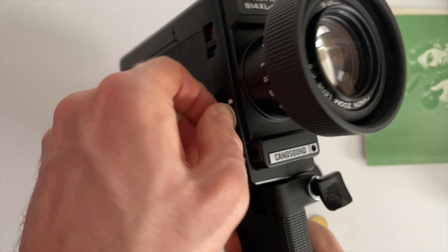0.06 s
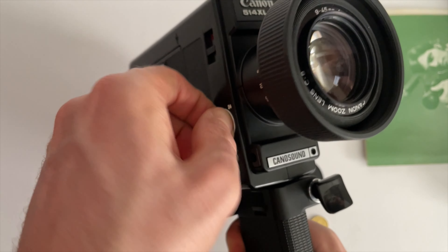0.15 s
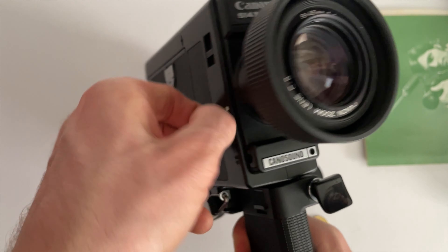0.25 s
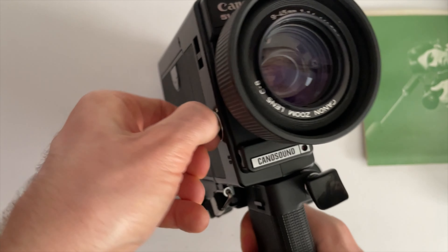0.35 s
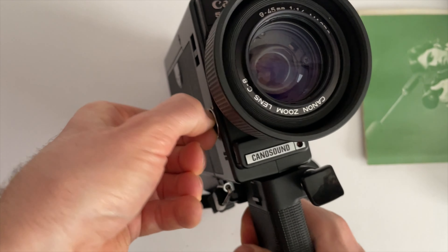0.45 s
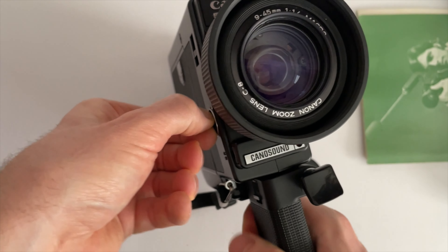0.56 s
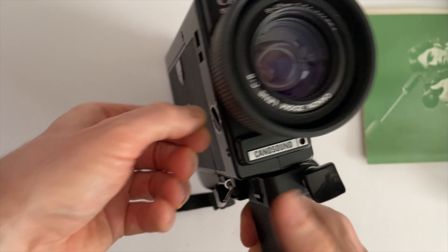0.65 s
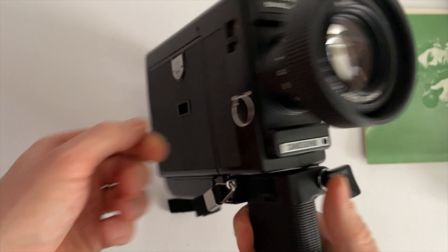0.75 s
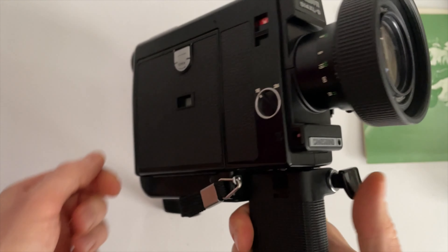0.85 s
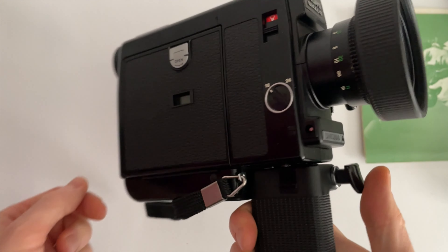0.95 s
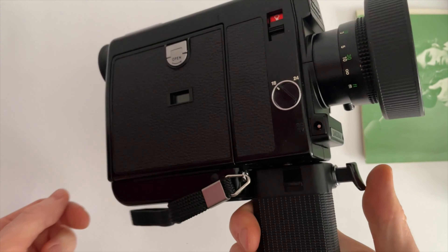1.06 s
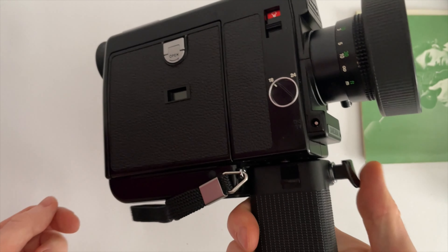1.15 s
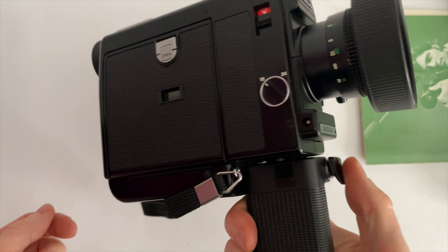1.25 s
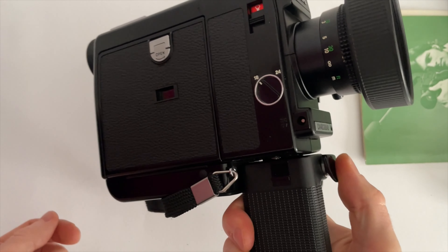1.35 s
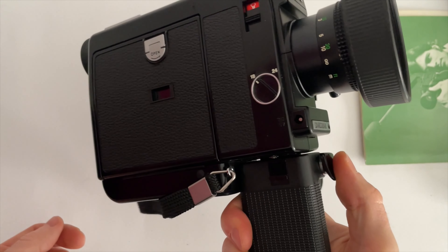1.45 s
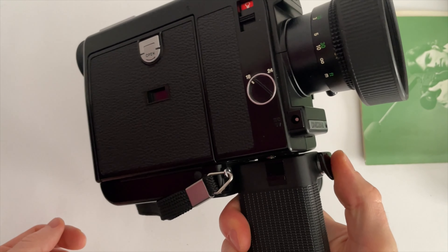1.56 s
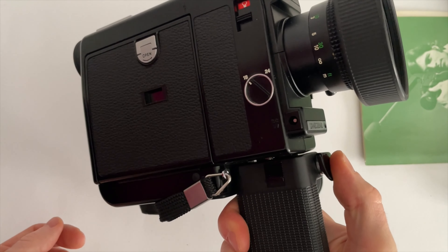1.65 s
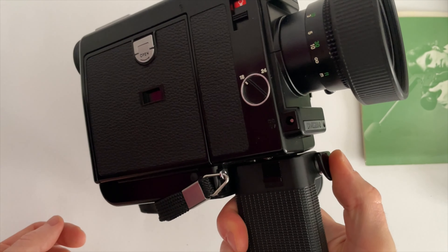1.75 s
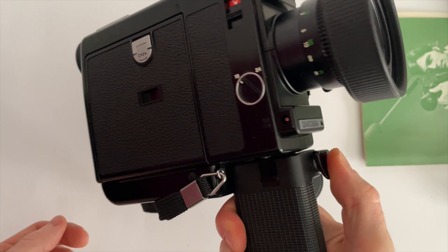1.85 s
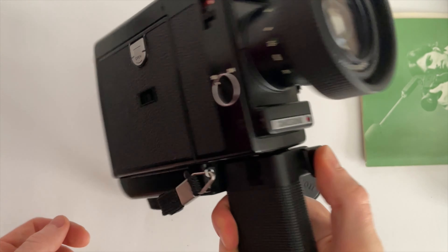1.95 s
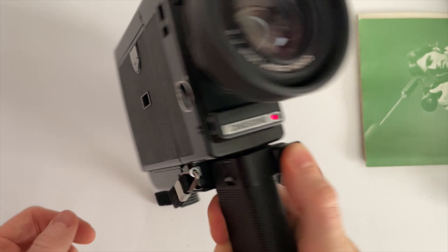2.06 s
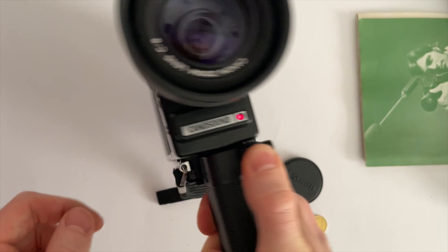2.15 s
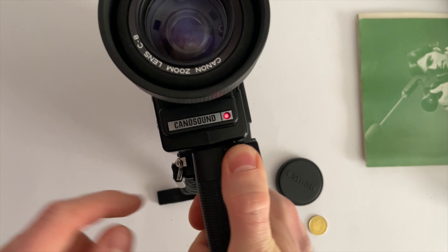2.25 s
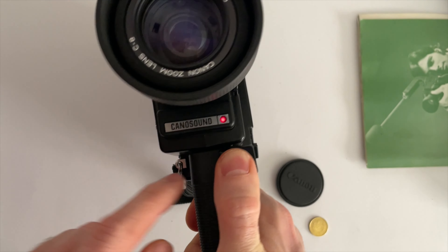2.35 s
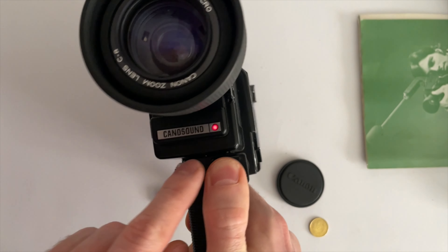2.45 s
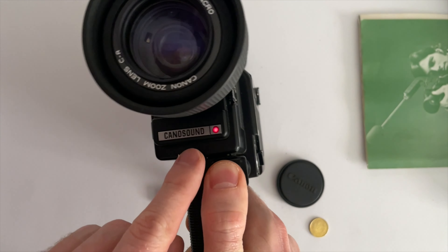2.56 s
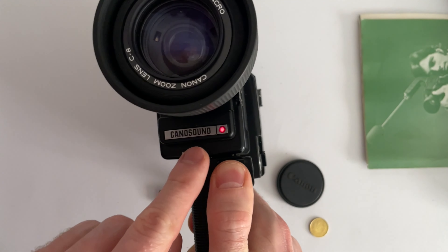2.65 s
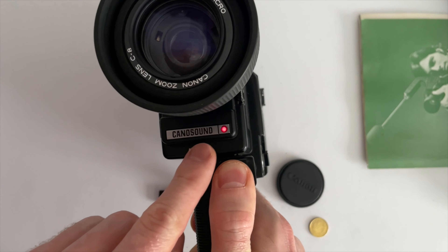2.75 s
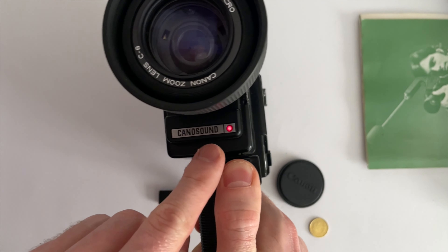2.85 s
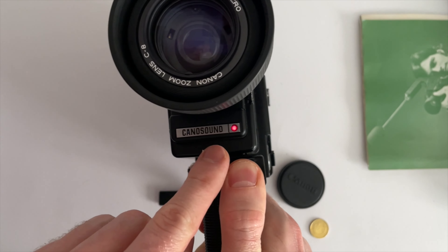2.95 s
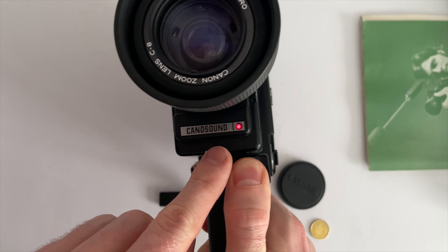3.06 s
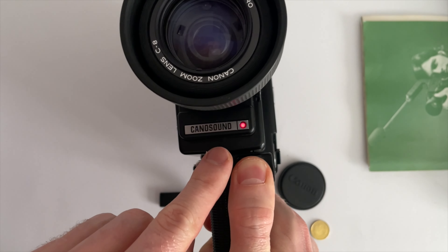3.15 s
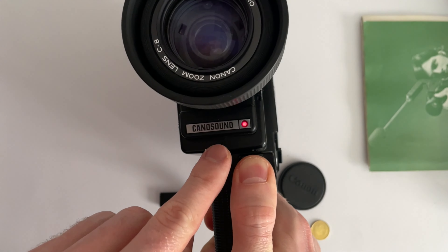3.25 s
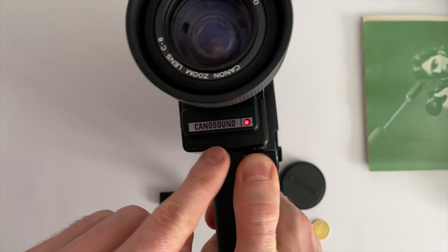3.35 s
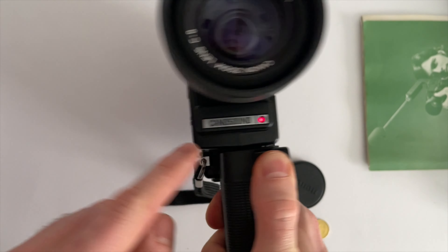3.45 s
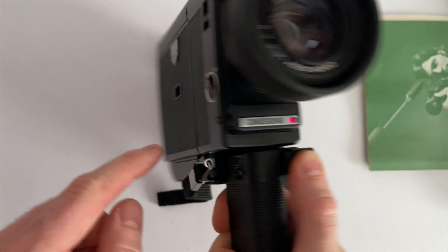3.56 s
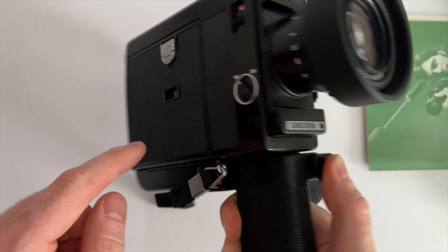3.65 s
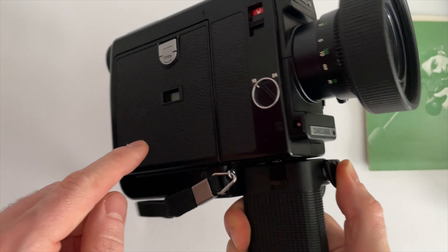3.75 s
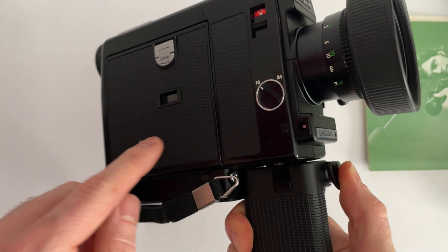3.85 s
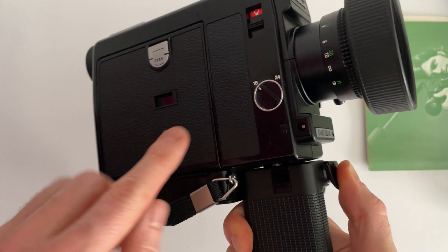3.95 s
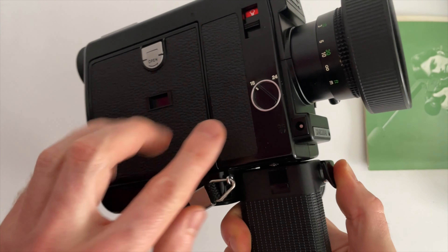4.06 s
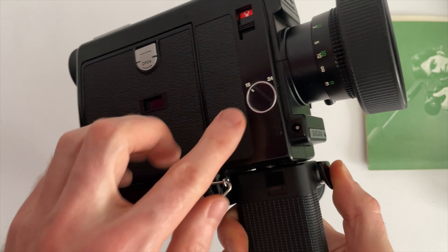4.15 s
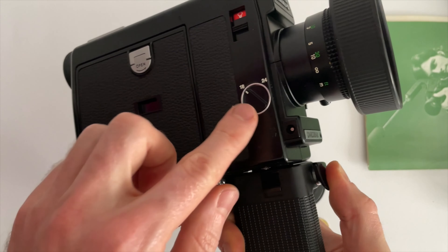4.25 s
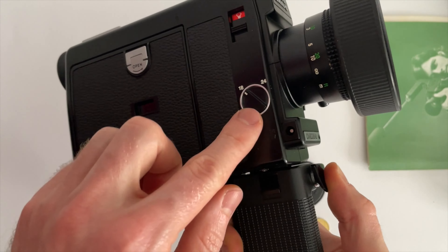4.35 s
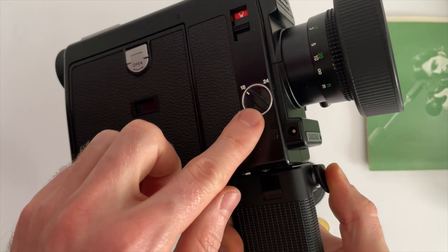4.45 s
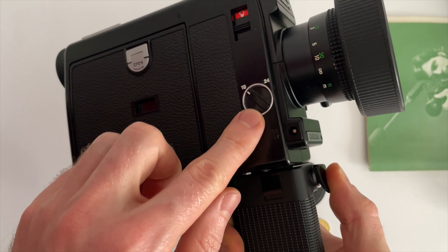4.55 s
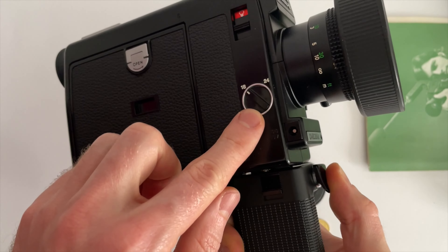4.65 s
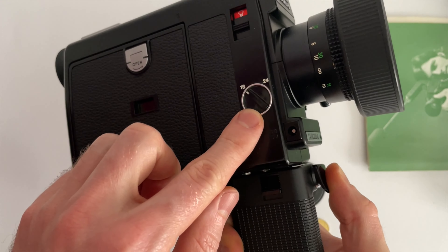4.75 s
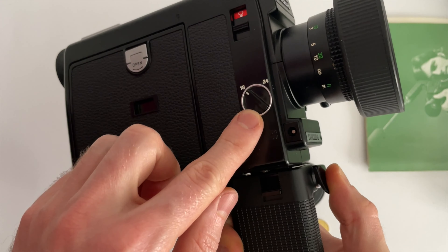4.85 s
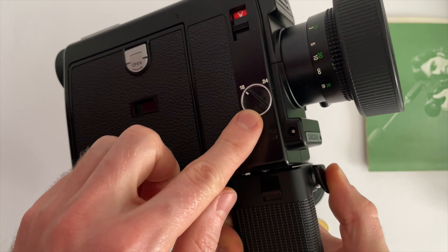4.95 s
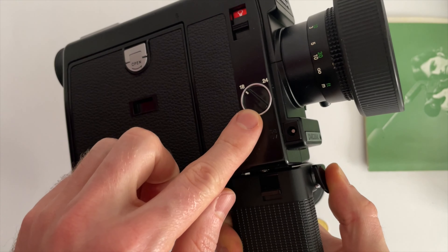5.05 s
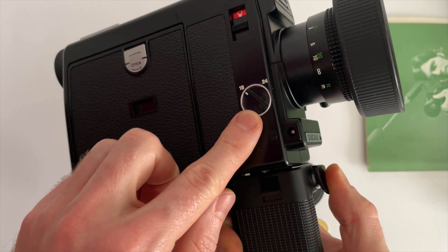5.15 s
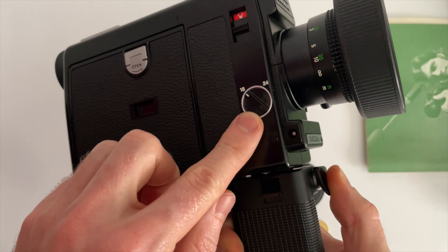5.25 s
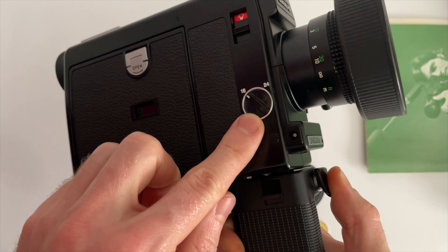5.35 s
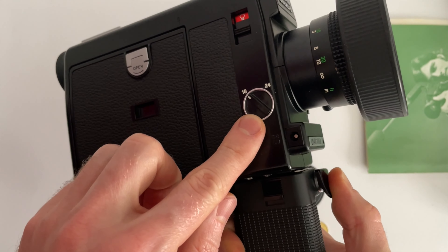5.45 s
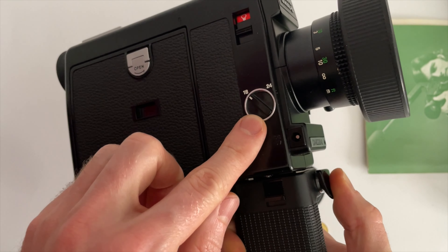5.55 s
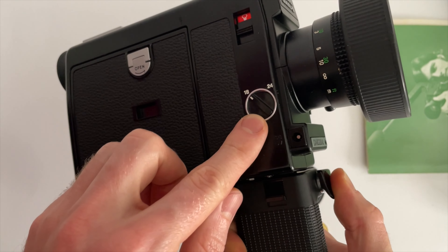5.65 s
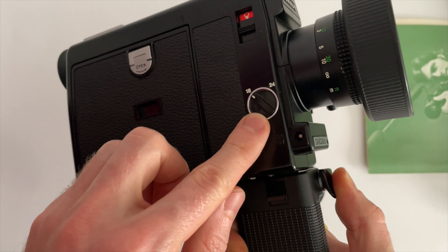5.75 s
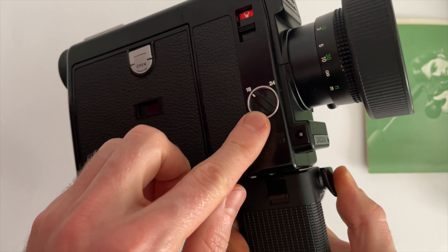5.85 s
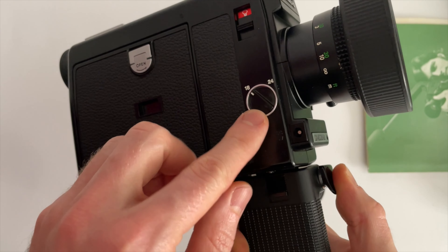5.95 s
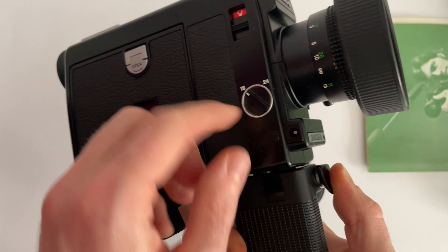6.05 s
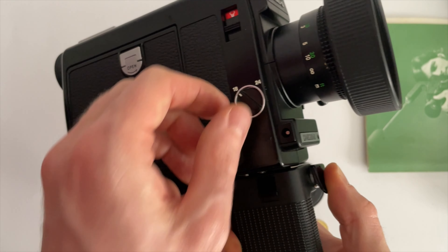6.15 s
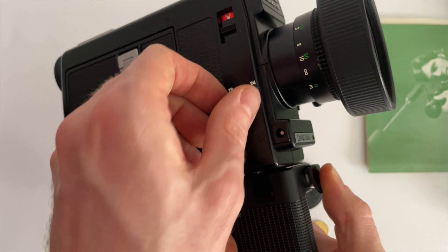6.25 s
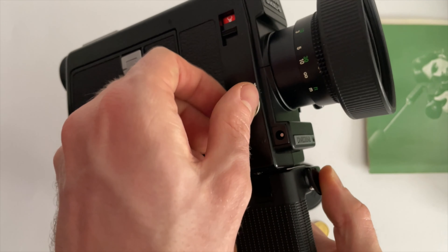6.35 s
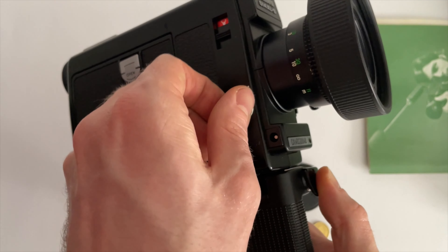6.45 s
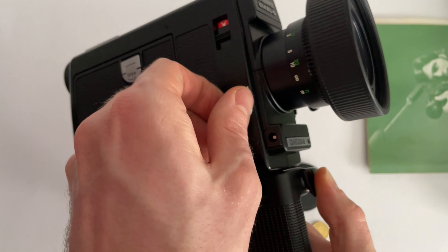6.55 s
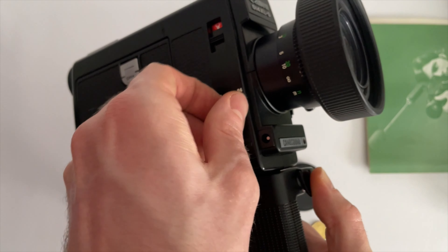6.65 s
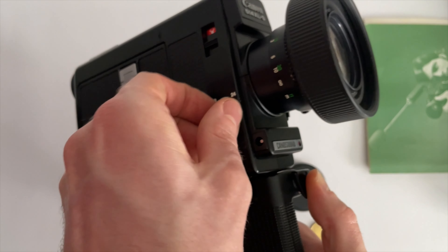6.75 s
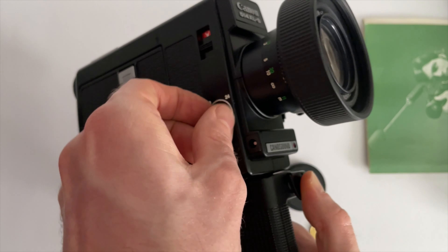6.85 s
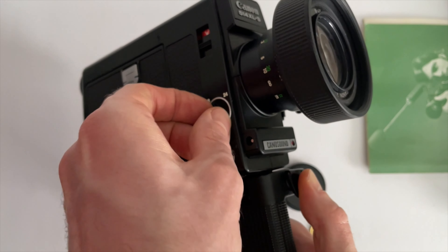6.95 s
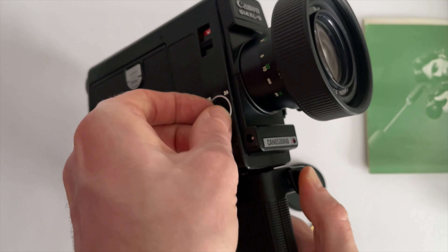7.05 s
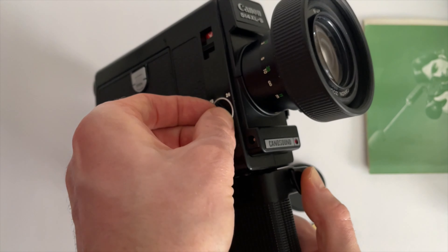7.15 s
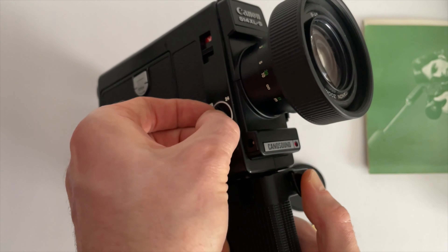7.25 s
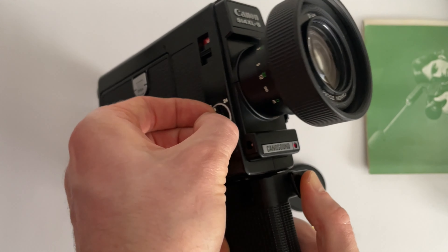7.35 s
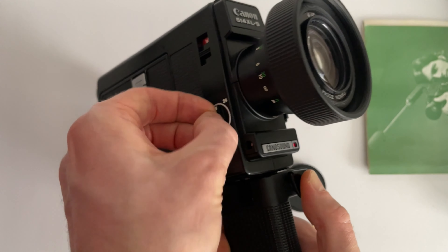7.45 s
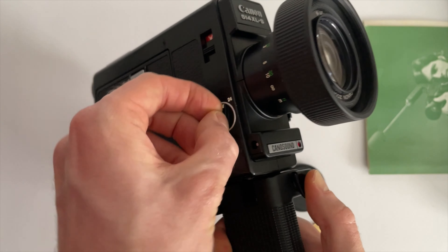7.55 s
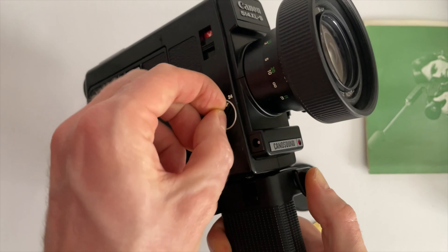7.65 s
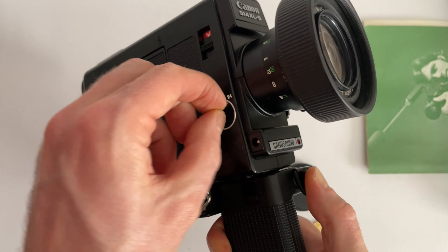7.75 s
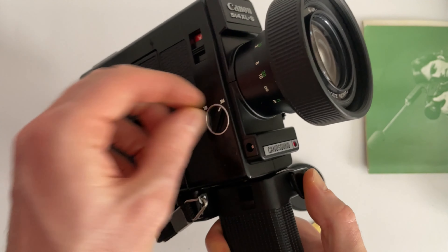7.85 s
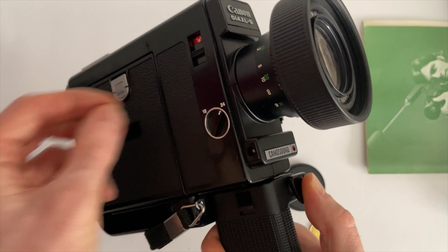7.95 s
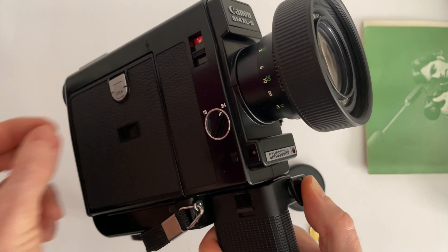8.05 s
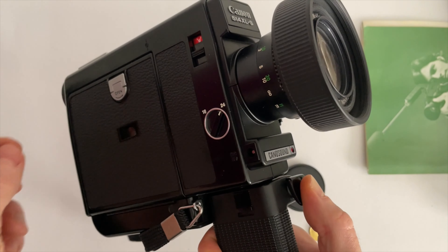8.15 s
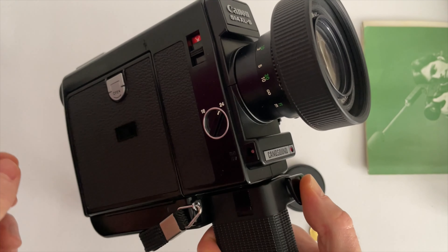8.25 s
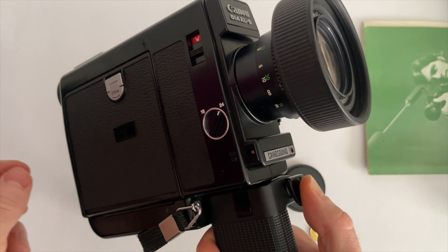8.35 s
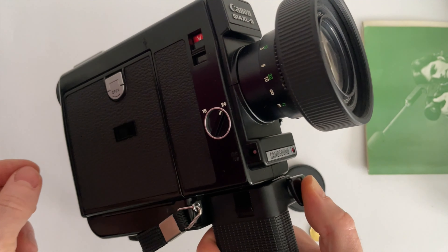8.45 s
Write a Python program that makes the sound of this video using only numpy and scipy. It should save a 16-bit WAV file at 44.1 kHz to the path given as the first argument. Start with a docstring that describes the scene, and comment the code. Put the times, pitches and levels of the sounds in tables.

```python
"""Fingers fumble at a small film camera held over a desk, close to a phone; a switch and the trigger snap,
then the motor runs. The claw clatters twice a frame over gear whirr and the hum of the shaft. The camera is
turned in the hand, and a dial clicks it over to the faster frame rate.
Knocks and rubs are short or shaped noise with ringing sines, the hum is a stack of sines, and filters
colour the camera's sound and set the left and right channels apart."""
import sys
import numpy as np
from scipy import signal
from scipy.fft import rfft, irfft, next_fast_len
from scipy.io import wavfile
from scipy.ndimage import uniform_filter1d, map_coordinates

SR = 44100
rng = np.random.default_rng(int(sys.argv[2]) if len(sys.argv) > 2 else 0)


def to_wav(s):
    """Save 16-bit WAV."""
    ch = np.atleast_2d(s).T  # columns
    pcm = np.round(np.clip(ch, -1, 1) * 32767)  # PCM
    wavfile.write(sys.argv[1], SR, pcm.astype(np.int16))


N = 374850
T = np.arange(N) / SR

# How fast the motor drives the claw. Each row: time in seconds, claw strokes per second.
STROKE_SPEED = [(1.449, 44.4), (1.5, 37.9375), (3.85, 37.9375), (3.95, 37.664), (6.65, 37.664),
                (6.75, 37.99), (7.5, 37.99), (7.62, 52.1), (7.78, 49.85), (8.5, 49.87)]
# How hard whirr, claw and wheel sound. Each row: time in seconds, level in dB before the case colours it.
DRIVE_LEVEL = [(1.5, -50), (1.65, -47.5), (3.83, -48), (4.3, -48.5), (5.58, -49), (7.5, -48), (7.6, -46.5),
               (8.5, -45.5)]
# Turns on which the wheel drags harder. Each row: time in seconds, added rub in dB against the whirr.
HARD_RUBS = [(3.53, 0.5), (3.95, 4.5), (4.59, -1), (4.8, 1), (5.01, 3.5), (5.23, 0.5), (5.44, -10),
             (7.34, -3), (7.55, 0), (8.19, -15), (8.35, -6)]
# The hardest claw blows. Each row: time in seconds, level in dB before the case colours it.
HARD_BLOWS = [(1.45, -36.5), (1.497, -35.5), (1.5493, -36), (1.6821, -35.5), (1.815, -39), (2.0809, -40),
              (2.1303, -35), (2.3962, -44), (3.237, -36), (3.2913, -35), (3.3179, -35.5), (3.6074, -44),
              (3.6594, -39), (3.7137, -42), (3.742, -34), (3.7663, -37), (4.002, -32.5), (4.136, -37),
              (4.2959, -43), (4.4812, -36), (4.72, -37.5), (4.774, -34.5), (5.012, -37), (5.1721, -36),
              (5.1985, -36.5), (5.33, -36.5), (5.5164, -36), (5.7551, -43), (6.0225, -49), (6.4223, -39),
              (6.6046, -43), (7.056, -35), (7.319, -35), (7.475, -35.5), (7.755, -38), (8.2067, -42),
              (8.2968, -46), (8.349, -47), (8.4135, -41)]
# The case seen from its side. Each row: frequency in Hz, gain in dB (9 dB is added to all).
CASE_COLOUR = [(250, -23), (520, -1), (650, 3), (880, -7), (1400, -1), (2200, -5.5), (3000, -1.5),
               (3800, -7), (4800, -6.5), (5500, -12), (6750, -4.5), (7300, -9), (10000, -14), (12000, -22),
               (15600, -25)]


def motor():
    """Gear whirr, claw and wheel sound through the case; impacts are brighter than the whirr."""
    started = T > STROKE_SPEED[0][0]
    count = np.cumsum(curves(STROKE_SPEED)[0] * started) / SR  # strokes made so far
    running = np.clip(3 * count, 0, 1)
    level = running * amp(curves(DRIVE_LEVEL)[0])

    waver = amp(0.98 * wobble(60) + 0.97 * wobble(8))
    tooth_db = -3  # pinion ticks against the smooth noise of the gears
    whirr = level * waver * unit(rng.standard_normal(N) + amp(tooth_db) * teeth(count))
    # the treble rises 0.5 dB per octave above 2 kHz
    whirr = filtered(whirr, lambda hz: amp(0.5 * np.log2(np.clip(hz / 2000, 1, None))))

    clatter = amp(by_rate(-0.35, -2.35)) * claw(count)  # at the fast rate the whirr grows over the claw
    rub = amp(by_rate(-5.5, -2.5))
    rub = rub + sum(amp(db) * (abs(T - s - .02) < .06) for s, db in HARD_RUBS)
    s, blow_db = np.transpose(HARD_BLOWS)
    impacts = level * (clatter + rub * wheel(count)) + bursts(s, blow_db, 0.039)
    impacts = filtered(impacts, lambda hz: amp(4.4 * np.log2((hz + 1) / 3500)))  # dB per octave

    hum = running * amp(curves(POSE)[2]) * shaft(count)
    enclosed = filtered(whirr + impacts, lambda hz: amp(along(CASE_COLOUR, hz) + 9))
    return held(enclosed + hum)


def claw(count):
    """Each stroke is a cluster of small impacts; the pull-down stroke is the harder of the two."""
    k = np.arange(int(count[-1]))
    draw = rng.standard_normal((len(k), 9))
    lag = np.array([0, .09, .19, .55]) + 0.028 * draw[:, :4]  # parts of a stroke
    times = np.interp(k[:, None] + lag, count, T)
    scatter_db = 1.8 * draw[:, 4:8] + 1.2 * draw[:, 8:]  # each impact, then the whole stroke
    softer_db = 0.86 * (k % 2)[:, None]
    db = np.array([2.5, -8.5, 0.5, -7.0]) + scatter_db - softer_db
    return unit(bursts(times.ravel(), db.ravel(), 0.017))


def teeth(count):
    """Every tooth of the motor pinion ticks, each with its own strength."""
    passed = count * 7 / 6 * 10  # ten teeth on each shaft turn
    k = np.arange(int(passed[-1]))
    draw = rng.standard_normal((len(k), 2))
    times = np.interp(k + .08 * draw[:, 0], passed, T)
    return unit(bursts(times, 3.5 * draw[:, 1], 0.009))


def wheel(count):
    """A slow wheel rubs briefly once in eight strokes; at the fast rate it also squeals."""
    squeal_hz, width_hz, squeal_db = 4410, 220, 8
    turn = (count + 1) % 8  # strokes since the rub began
    touch = np.clip(8 * turn, 0, 1) * np.clip(3 * (1.6 - turn), 0, 1)
    rub = rng.standard_normal(N)
    squeal = filtered(rub, lambda hz: amp(squeal_db) / (1 + (2 * (hz - squeal_hz) / width_hz) ** 2))
    return touch * (rub + fast(T) * squeal)


# The tones of the hum. Each row: multiple of the shaft speed (rounded when played),
# strength in dB at the slow rate, strength in dB at the fast rate.
SHAFT_TONES = [(5, -38, -10.5), (10, -4, -10), (11, -8, -3), (12, -17, -13), (13, -21, -28),
               (14.1, -2, -18), (14.8, -1.5, -18), (16, -22, -20), (17, -15.5, -16), (18, -25, -19),
               (19, -20, -15), (21, -21, -14), (24, -18, -10), (25.8, -11, -25), (30, -22, -21),
               (33, -16, -17), (36, -9, -8), (42, -22, -14)]


def shaft(count):
    """Motor hum: seven shaft turns to six strokes; the higher a multiple, the more it wavers."""
    turns = count * 7 / 6
    hum = 0
    for k, slow_db, fast_db in SHAFT_TONES:
        waver_db = .1 * k * wobble(9)
        waver_rad = .0075 * k ** 1.5 * wobble(16)
        tone = np.sin(2 * np.pi * round(k) * turns + waver_rad)
        hum = hum + amp(by_rate(slow_db, fast_db) + waver_db) * tone
    return hum


# How the sound changes over time. Each row: time in seconds, frequency in Hz below which the bass is cut,
# lens turned towards the phone from 0 to 1, level of the hum in dB before the bands below colour it.
POSE = [(1.45, 473, 0, -54.5), (1.95, 480, 0.3, -52.5), (2.2, 654, 0.94, -55), (3.5, 631, 0.92, -54),
        (3.7, 463, 0.28, -52), (4.0, 443, 0.2, -51.5), (6.2, 420, 0.22, -53), (6.7, 482, 0.62, -51.5),
        (7.0, 576, 0.7, -51.5), (7.45, 546, 0.65, -51), (8.05, 616, 0.4, -53), (8.3, 900, 0.26, -53.5),
        (8.5, 930, 0.46, -49)]
# What the lens facing the phone changes. Each row: frequency in Hz, change in dB.
LENS_CHANGE = [(700, -1.5), (1000, 0), (1800, 1), (3500, -0.5), (4700, -6), (5800, 1), (6800, -8.5),
               (9000, -5.5), (15000, -1.5)]
# Panels that ring. Each row: centre in Hz, width in Hz, gain in dB side-on,
# gain in dB lens-on, gain in dB at the fast rate.
RINGING_PANELS = [(720, 38, -3, 7.5, 0), (983, 49, -1, 13.5, 3), (1116, 67, 7, 0, 7),
                  (1407, 166, 7, 2.5, 4), (1670, 96, 2, 1, -2), (1840, 310, -1, 6, 6.5),
                  (2130, 150, 3.5, 0.5, 2), (2460, 160, 5, 4, 5.5), (3130, 160, 1, -1.5, 0),
                  (3490, 74, -6.5, 6, 2.5), (4420, 110, 3, 1.5, 3), (4780, 250, 6, 4, 5),
                  (5460, 160, 1.5, 7.5, 4), (6400, 560, 1, 3.5, 4.5)]


def held(x):
    """The bass edge of the sound moves over time, and other bands ring as the camera turns."""
    hz, t, z = signal.stft(x, SR, nperseg=1024)
    edge_hz, lens = curves(POSE, t)[:2]
    hz = hz[:, None] + 1
    tilt_db = by_rate(-0.66, 1, t) * np.log2(hz / 1500)  # dB per octave
    bass_cut_db = by_rate(20, 9, t) / (1 + (hz / edge_hz) ** 30)
    db = tilt_db + lens * along(LENS_CHANGE, hz) - bass_cut_db
    for centre, width, side_on, lens_on, quick in RINGING_PANELS:
        facing = side_on + lens * (lens_on - side_on)
        centre = centre * (1 + 0.004 * wobble(2.93, t))  # the grip shifts a little
        gain = by_rate(facing, quick, t)
        db = db + gain / (1 + (2 * (hz - centre) / width) ** 2)
    return signal.istft(z * amp(db), SR, nperseg=1024)[1][:N]


# Finger, switch, trigger and dial clicks. Each row: start in seconds, level in dB,
# hollow ring in dB against that level, ping in Hz, ping in dB against the level, treble tilt in dB per octave.
CLICKS = [(0.0024, -55, -3.5, 1160, 5, -11), (0.172, -61, -33, 2660, 3, -4),
          (0.1997, -52.5, -30, 1750, -1, -6), (0.2458, -57, -31, 1320, -4, -2.5),
          (0.3571, -52, -33, 3020, -4, -3), (0.362, -40.5, -35, 1780, 0, -2),
          (0.3755, -61, -30, 1750, 3, -4), (0.407, -54, -26, 1130, 8, -5), (0.4167, -55, -25, 1320, 7, -4),
          (0.4274, -56.5, -19, 1240, 11, -8), (0.445, -51, -26, 2310, 0, -7.5),
          (0.4888, -57.5, -24, 1370, 4, -5), (0.5614, -61.5, -28, 3730, -8, 1.5),
          (1.0335, -65, -5, 972, 0, -11), (1.122, -43, -16, 2270, -5, -2),
          (1.1604, -40.5, -17, 5400, -3, -2.5), (1.1768, -25, -31, 2880, -8, 0.5),
          (1.1837, -31.5, -24, 1940, -1, -2), (1.195, -33, -17, 1020, -6, -3.5),
          (1.2094, -50.5, -4, 990, -6, -15.5), (1.259, -39, -35, 3030, -6, 1),
          (1.263, -19.5, -29, 5560, -3, -1), (1.2669, -21, -10.5, 2140, -12, -2.5),
          (1.9989, -46, -28, 2960, -6, -4), (6.3135, -35, -10, 1130, 4, -4),
          (7.2655, -33, -28, 1440, -3, -1.5), (7.29, -23.5, -29, 1000, -2.5, -5.5),
          (7.6134, -14, -28.5, 2300, -4, -3), (7.8121, -33, -10, 830, 4, -5)]
# Tones of the plastic shell. Each row: frequency in Hz, strength in dB before the click's own tilt.
SHELL_TONES = [(1330, -13), (2080, -1), (2900, 2.5), (3600, -0.5), (4720, 0), (5600, -5.5), (6400, 5)]
# Tones of the empty film chamber. Each row: frequency in Hz, strength in dB, seconds to fade by 60 dB.
CHAMBER_TONES = [(677, 7, 0.038), (653, -21.5, 0.49), (844, -21, 0.012), (306, -18, 0.1),
                 (1234, -6.5, 0.066)]


def clicks():
    """A crack of plastic rings the shell and pings the part that was touched; the chamber rings after it."""
    out, t = np.zeros(N + SR), T[:SR // 4]
    hz = np.fft.rfftfreq(len(t), 1 / SR) + 1
    # small parts radiate no bass
    thin = signal.butter(N=2, Wn=550, btype="high", fs=SR, output="sos")

    def fade(seconds):
        return amp(-60 * t / seconds)

    def coloured(colour):
        return irfft(rfft(rng.standard_normal(len(t))) * colour, len(t))

    for s, db, ring_db, ping_hz, ping_db, tilt in CLICKS:
        colour = amp(tilt * np.log2(hz / 2500)) / (1 + (650 / hz) ** 4)
        crack = fade(0.016) * coloured(colour)

        shell = 0
        for f, g in SHELL_TONES:
            strength = amp(g + tilt * np.log2(f / 2500) + rng.normal(0, 3))
            shell = shell + strength * np.sin(2 * np.pi * (f * rng.normal(1, .02) * t + rng.random()))
        shell = amp(-12) * fade(0.012) * shell

        # loose parts chatter on: the noise jumps in level every 63 samples
        steps = np.repeat(rng.standard_normal(len(t) // 63 + 1), 63)[:len(t)]
        rattle = amp(-19) * fade(0.11) * amp(5 * steps) * coloured(colour)

        ping = amp(ping_db) * fade(0.009) * np.sin(2 * np.pi * ping_hz * t)
        snap = (crack + shell + rattle + ping) * (1 - np.exp(-t / 0.00031))
        snap = signal.sosfilt(thin, snap)

        ring = 0
        for f, g, life in CHAMBER_TONES:
            ring = ring + amp(g + rng.normal(0, 0.88)) * fade(life) * np.sin(2 * np.pi * f * t)
        ring = amp(ring_db) * ring * (1 - np.exp(-t / 0.0031))
        out[round(s * SR):][:len(t)] += amp(db) * (snap + ring)
    return out[:N]


# Knocks to the whole body. Each row: start in seconds, level in dB before rise and fade, pitch in Hz.
BODY_THUMPS = [(1.266, -53, 328), (2.0, -58, 260), (6.315, -65, 332), (7.293, -50, 297), (7.615, -55, 352)]


def thumps():
    """The whole body is knocked and answers with a short low tone."""
    out, t = np.zeros(N + SR), T[:SR // 4]
    shape = amp(-60 * t / 0.07) * (1 - np.exp(-t / 0.0023))
    for s, db, thump_hz in BODY_THUMPS:
        out[round(s * SR):][:len(t)] += amp(db) * shape * np.sin(2 * np.pi * thump_hz * t)
    return out[:N]


# Skin sliding on the case. Each row: start in seconds, hold in seconds, rub in dB, hiss in dB.
SLIDES = [(0, 0.013, -70.5, -84), (0.2, 0.033, -71, -78), (0.37, 0.07, -78, -94), (.575, 0, -85, -79),
          (.79, 0, -85, -82), (0.884, 0.0055, -90, -84)]
# Colour of the rub. Each row: frequency in Hz, relative level in dB.
SKIN_COLOUR = [(290, -61), (500, -27), (1850, -5), (2000, -15), (2580, -8), (3100, -10), (6500, -24),
               (8450, -48), (14300, -120)]
# Colour of the hiss. Each row: frequency in Hz, relative level in dB.
HISS_COLOUR = [(2500, -30), (5000, -4), (9000, -6), (13000, -9), (16000, -20)]


def fingers():
    """Grainy skin noise before the motor starts, a duller rub and a brighter hiss."""
    slides = [swell(s, hold, 700, 350) for s, hold, *_ in SLIDES]  # rise and fall in dB per second
    rub, hiss = amp(np.transpose(SLIDES)[2:]) @ slides
    grain = amp(4.1 * wobble(220))
    return grain * (rub * noise(SKIN_COLOUR) + hiss * noise(HISS_COLOUR))


# Sudden shakes. Each row: time in seconds, level in dB before the random wavering.
SHAKE_JOLTS = [(0, -68.5), (0.45, -82), (1.99, -71.5), (3.25, -68), (3.75, -83), (4.66, -84), (5.14, -74),
               (6.12, -78), (7.29, -75), (7.62, -79)]
# Colour of the shaking. Each row: frequency in Hz, relative level in dB.
SHAKE_COLOUR = [(15, -43), (25, -9), (59, 3.5), (174, -7), (209, -2), (243, -5), (400, -5.5), (520, -3.5),
                (880, -120)]


def rumble():
    """Low shaking through hand and desk: it goes on once the trigger is gripped, wavering, with jolts."""
    rest_db, grip_db, grip_fast_db = -93, -77.5, -74.5
    level = amp(np.where(T < 1.11, rest_db, by_rate(grip_db, grip_fast_db)))  # the grip closes at 1.11 s
    for s, db in SHAKE_JOLTS:
        level = level + amp(db) * swell(s, 0, 147, 154)  # rise and fall in dB per second
    return level * amp(4.0 * wobble(6.3)) * np.array([noise(SHAKE_COLOUR), noise(SHAKE_COLOUR)])


def widened(x):
    """A copy with slowly drifting random phases, which widens the stereo image."""
    z = signal.stft(x, nperseg=256)[2]
    phases = uniform_filter1d(rng.standard_normal(z.shape), size=3, axis=0)
    phases = uniform_filter1d(phases, size=120, axis=1)
    return signal.istft(z * np.exp(2j * unit(phases)), nperseg=256)[1][:N]


# How long the room rings. Each row: frequency in Hz, seconds to fade by 60 dB.
ROOM_FADE = [(300, 0.43), (2000, 0.43), (10000, 0.22)]


def room(x):
    """Two unrelated tails of fading noise; each frequency dies at its own speed."""
    hz, t, z = signal.stft(rng.standard_normal((2, SR // 2)), SR, nperseg=256)
    fade = amp(-60 * t / along(ROOM_FADE, hz)[:, None])
    tail = signal.istft(z * fade, SR, nperseg=256)[1]
    delayed = np.pad(x, (200, 0))[None]  # samples
    return signal.fftconvolve(delayed, tail / np.linalg.norm(tail[0]), axes=1)[:, :N]


# Colour of the background. Each row: frequency in Hz, relative level in dB.
AIR_COLOUR = [(25, -2), (60, 3.5), (200, -3), (500, -14.5), (1000, -13.5), (2500, -17), (7000, -23.5),
              (10000, -26), (15600, -27)]


def air():
    """Steady background noise; the part that differs between left and right is 2.5 dB stronger."""
    return amp(-79.0) * np.array([noise(AIR_COLOUR), amp(2.5) * noise(AIR_COLOUR)])


def amp(db):
    """Turns dB into a plain factor."""
    return 10 ** (np.asarray(db) / 20)


def unit(x):
    """Scales a signal to an rms of 1."""
    return x / np.sqrt(np.mean(x ** 2) + 1e-20)


def along(points, hz, order=1):
    """Column `order` of (Hz, value, ..) points on a log axis."""
    table = np.transpose(points)
    return np.interp(np.log(hz + 1), np.log(table[0] + 1), table[order])


def curves(rows, t=T):
    """One value per moment for each column after the time."""
    s, *cols = np.transpose(rows)
    return [np.interp(t, s, c) for c in cols]


def wobble(rate, t=T):
    """A smooth random curve, rate knots a second."""
    coarse = T[::32]
    knots = rng.standard_normal(int(N * rate / SR) + 4)
    return np.interp(t, coarse, map_coordinates(knots, [coarse * rate]))


def filtered(x, response):
    """x times a response of frequency, which may be complex."""
    m = next_fast_len(N + 8192)
    return irfft(rfft(x, m) * response(np.fft.rfftfreq(m, 1 / SR)), m)[..., :N]


def noise(spectrum):
    """Noise of rms 1 with the given colour."""
    return unit(filtered(rng.standard_normal(N), lambda hz: amp(along(spectrum, hz))))


def bursts(times, db, t60):
    """Noise bursts that swell in about a millisecond and fade by 60 dB in t60 seconds."""
    starts = np.bincount(np.clip(times * SR, 0, N - 1).astype(int), amp(db), N)
    t = T[:2000]
    shape = amp(-60 * t / t60) * (1 - np.exp(-t / 0.0011))
    return signal.fftconvolve(starts, shape)[:N] * rng.standard_normal(N)


def fast(t):
    """0 at the slow frame rate, 1 at the fast one."""
    return np.interp(t, [7.5, 7.62], [0, 1])


def by_rate(slow, quick, t=T):
    """Glides from the slow-rate value to the fast-rate one."""
    return slow + (quick - slow) * fast(t)


def swell(start, hold, rise, fall):
    """Gain 1 during the hold, with straight dB slopes on both sides."""
    return amp(-rise * np.clip(start - T, 0, 1) - fall * np.clip(T - start - hold, 0, 1))


def scene():
    """Row 0 is shared by left and right; row 1 is what differs between them."""
    camera = motor() + clicks() + thumps() + fingers()
    wide = widened(camera)
    tails = amp([[-14], [-7]]) * room(wide)
    return np.array([camera, wide]) + tails + rumble() + air()


# Left and right channels. Each row: frequency in Hz, lag of the left in radians, left minus right in dB,
# likeness from 0 to 1. Each channel takes half the lag and half the dB, times its side factor.
CHANNEL_DIFFERENCES = [(59.7, 0.34, 1.5, 1), (610, 0.72, -3.5, 0.76), (1470, 0.65, -3.5, 0.74),
                       (3000, 1.03, -5, 0.6), (4200, 0.48, -5.5, 0.67), (5230, 1.23, -8, 0.83),
                       (6200, 0.95, -1.5, 0.62), (6670, 4.53, -9.5, 1), (7100, 3.81, 3.5, 1),
                       (8410, 3.09, 0, 1), (10620, 6.37, -1.5, 0.5), (13100, 8.1, 0.5, 0.88),
                       (13900, 11.1, -1.5, 0.96), (15600, 9.9, 1, 0.9)]


def record(dry):
    """Left and right channels: lag, level and likeness by frequency; deep bass and top treble fall away."""
    edge_hz, top_hz = 15800, 16920  # steep roll-off, then nothing at all

    def channel(side):
        def response(hz):
            lag = np.exp(-side * .5j * along(CHANNEL_DIFFERENCES, hz))
            gain = amp(side * along(CHANNEL_DIFFERENCES, hz, order=2) / 2)
            likeness = np.clip(along(CHANNEL_DIFFERENCES, hz, order=3), 0, 1)
            turn = np.arccos(likeness) / 2  # less alike: more of row 1, with opposite signs
            mix = np.array([np.cos(turn), side * np.sin(turn)])
            return lag * gain * mix / (1 + (hz / edge_hz) ** 120) * (hz < top_hz)

        heard = filtered(dry, response).sum(axis=0)
        return filtered(heard, lambda hz: 1 / (1 + (38 / (hz + 1)) ** 4))

    return np.array([channel(0.84), channel(-1.037)])  # left, right


dry = scene()
out = record(dry)
to_wav(out)
```